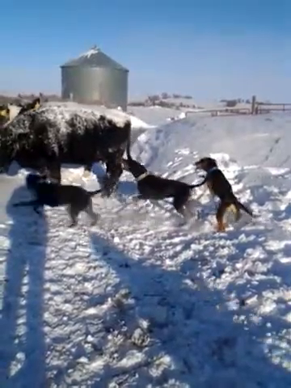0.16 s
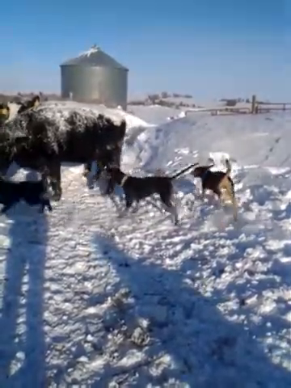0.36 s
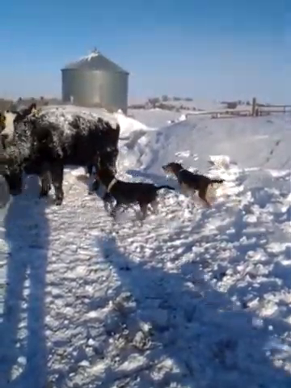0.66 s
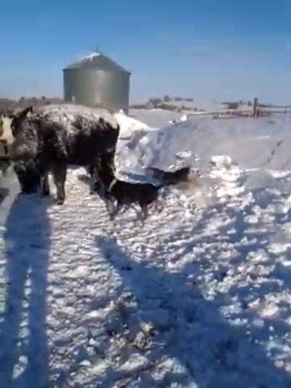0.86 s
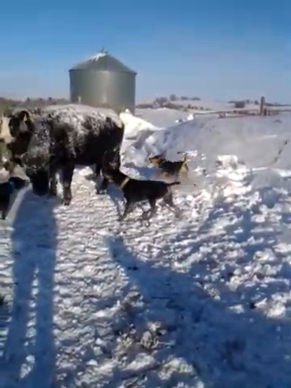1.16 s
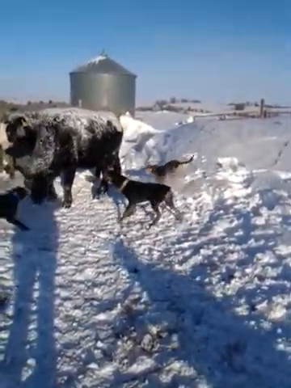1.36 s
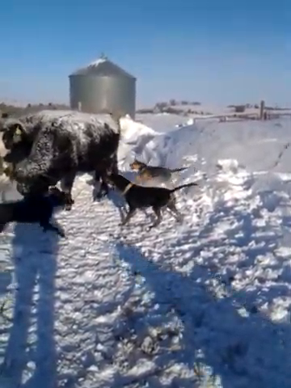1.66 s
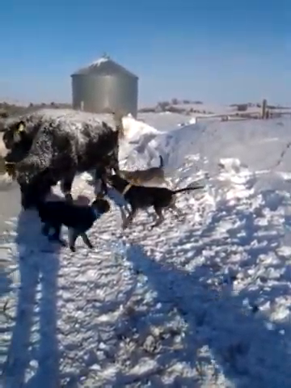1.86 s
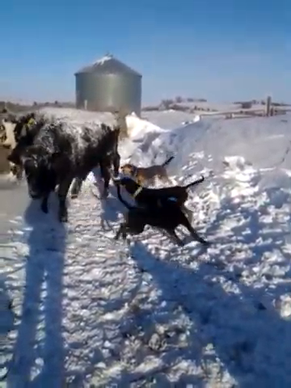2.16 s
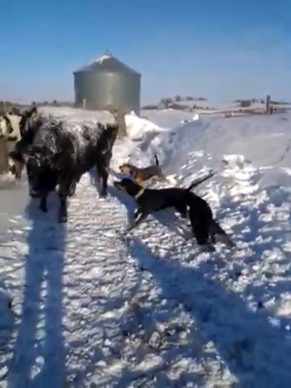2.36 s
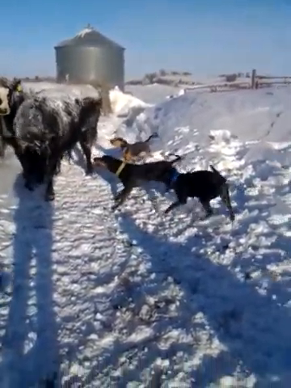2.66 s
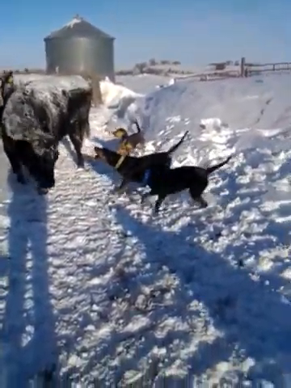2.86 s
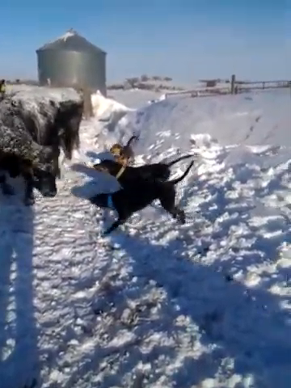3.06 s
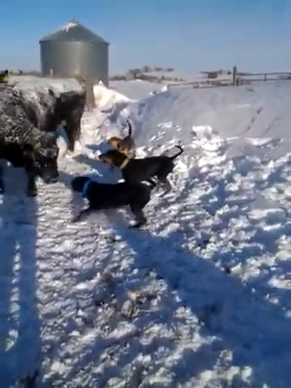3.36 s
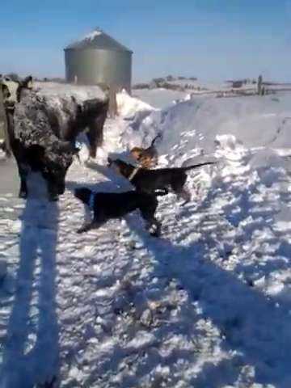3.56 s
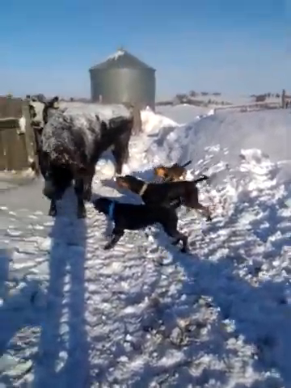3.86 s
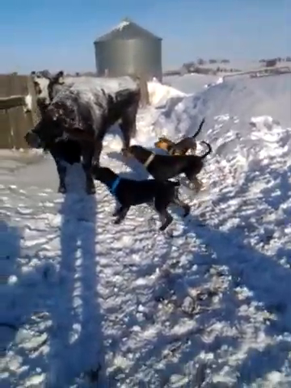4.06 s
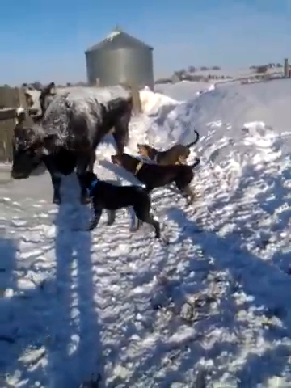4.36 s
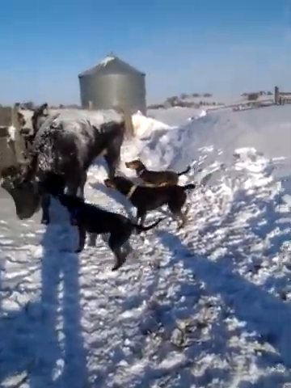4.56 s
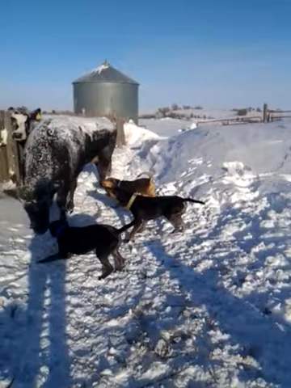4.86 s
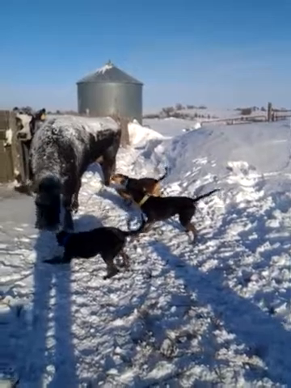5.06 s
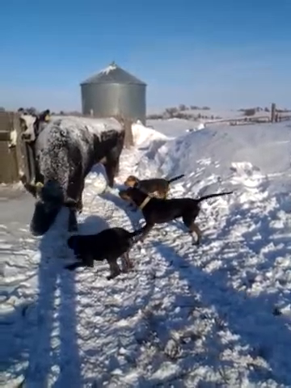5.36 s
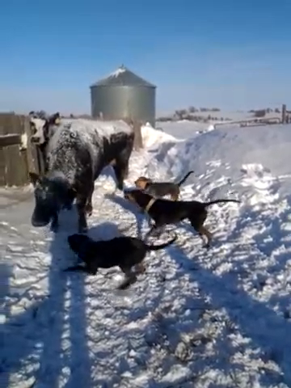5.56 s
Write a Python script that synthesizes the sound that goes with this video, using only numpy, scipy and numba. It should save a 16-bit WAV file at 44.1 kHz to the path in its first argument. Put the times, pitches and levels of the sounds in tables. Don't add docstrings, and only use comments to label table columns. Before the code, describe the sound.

Three or so dogs bay almost without pause at a cow on a snowy farm. Full barks open rough and lock onto a ringing note, others are hoarse or sinking, with whines, a yip and a squeal around the middle. Snow crunches quietly beneath, with a dull hoof shift. Loud peaks clip flat on the right; the left is muffled, quiet and slightly hissy.

```python
import sys
import numpy as np
from scipy import signal
from scipy.fft import rfft, irfft, next_fast_len
from scipy.io import wavfile
from scipy.ndimage import uniform_filter1d, map_coordinates
from numba import njit

SR = 44100
rng = np.random.default_rng(int(sys.argv[2]) if len(sys.argv) > 2 else 0)


def gain_from_db(level_db):
    decades = np.asarray(level_db, float) / 20
    return 10 ** decades


def output_pcm(signal):
    pcm = np.clip(np.atleast_2d(signal).T, -1, 1) * 32767
    wavfile.write(sys.argv[1], SR, np.round(pcm).astype(np.int16))


N = 252252


def unit(x):
    return x / np.sqrt(np.mean(x ** 2) + 1e-20)


def along(points, hz):
    f, v = np.transpose(points)
    return np.interp(np.log(hz + 1), np.log(f + 1), v)


def wobble(count, rate):
    knots = rng.standard_normal(int(count * rate / SR) + 4)
    return map_coordinates(knots, [np.arange(count) * rate / SR])


def coloured(x, points, lag=0):
    m = next_fast_len(N + 8192)
    hz = np.fft.rfftfreq(m, 1 / SR)
    response = gain_from_db(along(points, hz)) * np.exp(-2j * np.pi * hz * lag)
    return irfft(rfft(x, m) * response, m)[..., :N]


def swells(events):
    t = np.arange(N) / SR
    return sum(gain_from_db(db) * np.exp(-((t - s) / spread) ** 2) for s, spread, db in events)


@njit
def resonate(x, hz, width):
    y = np.zeros(len(x))
    r = np.exp(-np.pi * width)
    for i in range(2, len(x)):
        drive = (1 - r * r) / 2 * (x[i] - x[i - 2])
        y[i] = drive + 2 * r * np.cos(2 * np.pi * hz[i]) * y[i - 1] - r * r * y[i - 2]
    return y


def clear_note(pitch, note_db, rasp_db, mouth, turns, strain, width_hz, fall_db):
    count = len(pitch)
    order = np.arange(1, 9)[:, None]
    near = 1 / np.hypot(1, (order * pitch - mouth) / width_hz)
    weight = (near ** 2 + .02) * gain_from_db(fall_db * np.log2(order)) / (1 + (order / 5) ** 4)
    whistle = .03 * (pitch / 1290) ** 4 / (1 + ((order * pitch - 5200) / 450) ** 4)
    weight = weight + whistle / (1 + gain_from_db(2 * (rasp_db - note_db + 17)))
    weight = weight * gain_from_db(3.5 * np.array([wobble(count, 60) for _ in order]))
    note = np.sum(weight * np.sin(2 * np.pi * order * turns), 0)
    note = note / np.sqrt(np.sum(weight ** 2, 0) / 2)
    return note * gain_from_db(58 * strain * wobble(count, 85.4))


def rough_rasp(mouth, turns, throat):
    count = len(mouth)
    loose = turns / 2 + .15 * wobble(count, 220)
    slaps = np.gradient(np.floor(np.maximum.accumulate(loose))) * gain_from_db(2.28 * wobble(count, 302.6))
    air = rng.standard_normal(count) * (1 + 0.13 * np.cos(2 * np.pi * loose))
    source = unit(slaps) + .5 * unit(air)
    rasp = resonate(resonate(source, mouth / SR, 330 / SR), mouth / SR, 330 / SR)
    for hz, w, db in throat:
        at = np.full(count, hz / SR)
        rasp = rasp + gain_from_db(db) * resonate(resonate(source, at, w / SR), at, w / SR)
    return rasp, air


def bark(rows, width_hz, throat, jitter, fall_db, air_db):
    s, *cols = np.transpose(rows)
    t = np.arange(s[0], s[-1], 1 / SR)
    pitch, note_db, rasp_db, mouth = [np.interp(t, s, c) for c in cols]
    count = len(t)
    strain = jitter + .04 / (1 + gain_from_db(note_db - rasp_db) ** 2)
    turns = np.cumsum(pitch * (1 + strain * wobble(count, 160))) / SR
    note = clear_note(pitch, note_db, rasp_db, mouth, turns, strain, width_hz, fall_db)
    rasp, air = rough_rasp(mouth, turns, throat)
    gust_db = 2.5 * wobble(count, 26)
    edge = np.clip(np.minimum(t - s[0], s[-1] - t) / 0.006, 0, 1)
    rough = unit(rasp) + gain_from_db(air_db + gust_db) * unit(air)
    return edge * (gain_from_db(note_db) * note + gain_from_db(rasp_db) * rough)


# mouth width/Hz, throat resonances (f/Hz, width/Hz, level/dB), overtone fall/dB per octave,
# level/dB at the covered port
VOICE_BODIES = [
    (90, [(1026.5, 318, 0.5), (1694, 192, -3), (2497, 290, -13.5)], -3, -2.5),
    (190, [(1150, 310, -3.5), (1621, 157, -4.5), (2410, 220, -26)], 2.5, -5),
    (254, [(1052, 300, -10.5), (1473, 266, -5.5), (1940, 248, -7.5)], 3, -4),
    (340, [(1570, 430, -7), (2260, 420, -44)], -8, -6),
    (405, [(1300, 280, -4), (1885, 230, -6.5)], 3.5, -4),
]
VOICE_JITTER = [.005, .018, .03, .012, .014]
VOICE_AIR = [-20, -17, -17.5, -16.5, -14.5]


def dog(calls, voice):
    width_hz, throat, fall_db, _ = VOICE_BODIES[voice]
    out = np.zeros(N + SR)
    for gesture, barks in calls:
        phase, bend, note_db, rasp_db, mouth = np.transpose(gesture)
        for start, rise, fall, db, hz in barks:
            s = start + rise + phase * np.where(phase < 0, rise, fall)
            rows = np.transpose([s, bend * hz, note_db + db, rasp_db + db, mouth * hz])
            call = bark(rows, width_hz, throat, VOICE_JITTER[voice], fall_db, VOICE_AIR[voice])
            out[round(s[0] * SR):][:len(call)] += call
    return out[:N]


# phase, pitch/ratio, clear note level/dB, rasp level/dB, mouth/ratio
LOCK_ON_GESTURE = [(-1, .56, -50.5, -38.5, 0.62), (-.68, .7, -21, -10, .7), (-.45, .89, -6.5, -3.5, 0.953),
                   (-.2, .95, -15, -0.5, 1.354), (0, 1.0, -6.5, -2, 1.05), (0.17, 1.0, 0.2, -9, 0.9),
                   (0.539, 1.0, -9, -14.5, 0.99), (.8, 0.94, -19.5, -14.5, 1.04),
                   (1, 1.5, -23, -36.5, 1.24)]
PUFF_GESTURE = [(-1, .95, -60, -27, 1.22), (0, 1.0, -33, -0.1, 0.93), (0.83, 0.99, -60, -21.5, 0.92)]
# t/s, rise/s, fall/s, level/dB, f/Hz. The big dog's full barks:
BIG_BARKS = [
    (.83, .092, 0.12, 1.5, 574),
    (1.555, 0.062, 0.13, -0.5, 575),
    (2.286, .096, 0.13, 2, 576.8),
    (3.272, 0.097, 0.11, -3, 581),
    (3.905, .105, 0.096, 0.5, 584),
    (4.534, .098, 0.12, -0.8, 582.3),
    (5.279, .114, 0.09, 0.8, 581.4),
]
BIG_CRACKS = [
    (.77, 0.048, 0.063, -26, 318.4),
    (.95, 0.013, 0.02, 0.1, 574.5),
    (1.675, 0.016, .02, -6.5, 571),
    (2.26, 0.025, 0.016, -42, 310),
    (2.42, 0.013, 0.023, -2, 559.5),
    (3.41, 0.016, 0.026, -11, 619.6),
    (5.25, 0.024, 0.016, -35, 313),
]


def big_dog():
    return dog([(LOCK_ON_GESTURE, BIG_BARKS), (PUFF_GESTURE, BIG_CRACKS)], 0)


SINGING_GESTURE = [(-1, 1.0, -31.5, -31.5, 1.13), (-0.52, .94, -18.5, -11.5, 1.64), (0, 1.0, -3.5, -6, 2),
                   (.3, 1.01, -2.5, -9, 1.92), (.5, 1.03, -13, -11.5, 2.02), (.56, 1.15, -12.5, -17.5, 1.2),
                   (0.793, 1.2, -18, -20, 1.3), (0.907, 1.01, -27, -20, 1.5)]
# t/s, rise/s, fall/s, level/dB, f/Hz
SINGER_BARKS = [
    (1.335, 0.041, .14, -2.5, 373.8),
    (1.835, 0.048, 0.088, -2, 387.6),
    (2.893, 0.046, 0.12, -2, 379.8),
    (4.29, 0.075, .08, -2.5, 383.6),
    (4.851, .059, .105, -1.2, 381.7),
    (5.53, 0.06, 0.094, -1, 384.1),
]


def singing_dog():
    return dog([(SINGING_GESTURE, SINGER_BARKS)], 1)


FALLING_GESTURE = [(-1, 1.0, -30, -38, 1.09), (-0.632, 1.05, -10.5, -10, 1.17), (0, .93, -9.5, -5.5, 1.287),
                   (.2, .86, -10, -9, 0.95), (.4, .73, -15, -24, 0.98), (.55, .69, -15, -39.5, 1.28),
                   (.72, .66, -28.5, -28, 0.53), (0.91, .56, -53, -29, 0.56)]
BLURT_GESTURE = [(-1, 1.02, -39, -41.5, 1.26), (-0.582, 1.1, -9.5, -9.5, 1.304), (0, .95, -14, -7, 1.556),
                 (.3, 1.0, -11.5, -14.5, 1.184), (.55, 0.9, -23.5, -14.5, 1.08),
                 (.72, 0.61, -26.5, -23, 1.22), (1, 1.6, -56, -37, 0.67)]
# t/s, rise/s, fall/s, level/dB, f/Hz
HOARSE_FALLS = [
    (.268, 0.045, .085, -3, 599.3),
    (2.485, 0.054, 0.14, -4, 615.5),
    (3.58, .05, .14, 1.2, 604),
]
HOARSE_BLURTS = [
    (.431, .045, 0.13, 0, 540),
    (3.057, .045, .115, -0.4, 545),
    (1.822, .03, 0.071, -1.5, 650),
    (3.203, 0.0262, .05, -6, 470),
    (4.105, .06, 0.12, -0.7, 570),
]


def hoarse_dog():
    return dog([(FALLING_GESTURE, HOARSE_FALLS), (BLURT_GESTURE, HOARSE_BLURTS)], 2)


ARCH_GESTURE = [(-1, .9, -25.5, -23.5, 1.59), (-.65, .94, -12.5, -15, 1.85), (-.3, 1.03, -13, -14, 1.6),
                (0, 1.08, -9, -12.5, 1.87), (.25, 1.02, -15.5, -11.5, 1.83), (0.435, 1.3, -23, -23.5, 1.17),
                (.68, 1.04, -20.5, -28.5, 1.09), (1, 0.63, -65.5, -32, 0.8)]
# t/s, rise/s, fall/s, level/dB, f/Hz
LOW_BARKS = [
    (1.012, 0.096, .135, -0.2, 434.4),
    (2.57, 0.043, 0.078, -3.5, 419.4),
    (3.255, 0.047, 0.047, -0.5, 406),
    (4.43, .06, 0.086, -4.5, 389),
    (5.0, 0.068, .135, -0.5, 428.7),
    (5.64, .05, 0.11, -1.5, 427),
]


def low_hoarse_voice():
    return dog([(ARCH_GESTURE, LOW_BARKS)], 4)


CRY_GESTURE = [(-1, .84, -38, -32.5, 0.72), (-0.644, 0.79, -11.5, -23.5, 0.85), (-.3, .9, -16, -18, 0.98),
               (0, 0.98, -22.5, -15, 0.91), (0.42, 1.0, -14.5, -13, 0.78), (1, 0.71, -35, -16.5, 0.71)]
DROP_GESTURE = [(-1, 1, -38.5, -35.5, .97), (-0.47, 1.0, -15, -31, 0.64), (-0.0084, 1.0, -13.5, -20, 1.0),
                (.4, 0.97, -19, -16, .88), (0.94, 0.642, -22, -18, 0.32)]
YIP_GESTURE = [(-1, .95, -27, -50, 1.05), (0.05, 1.0, -5, -28, 1.9), (.6, 1.05, -9, -19, 2.3),
               (1, 1.08, -24, -26, 1.8)]
BREAK_GESTURE = [(-1, .68, -25, -32, .9), (-.6, .78, -7, -23, 1.28), (0, .98, -9, -32, 0.83),
                 (.5, 1.01, -8.5, -42, 0.9), (.85, 1.0, -12, -34, 0.55), (1, .99, -22, -33, .985)]
# t/s, rise/s, fall/s, level/dB, f/Hz; the next three tables have the same columns
YELP_CRIES = [
    (1.445, .055, 0.082, -1.5, 1231),
    (3.203, 0.05, 0.038, 0.1, 1190),
    (4.984, 0.05, 0.041, 0.1, 1176),
    (5.65, .045, 0.017, -5, 1198),
]
WHINE_CRIES = [
    (1.901, 0.048, 0.045, -1, 1255),
    (1.935, .07, .04, -8, 637),
    (2.60, .03, .045, -9, 1300),
    (3.845, 0.047, 0.042, -16.5, 559),
    (4.395, .05, .015, -1.5, 1200),
    (1.435, 0.037, 0.024, -1.5, 851),
    (4.325, 0.049, 0.013, -6.5, 1150),
    (5.03, .06, 0.039, -7, 1287),
]
YIP_CRIES = [
    (3.823, 0.015, 0.026, 0.091, 759),
]
SQUEAL_CRIES = [
    (3.846, .029, 0.0764, 0.1, 1278),
]


def yelps():
    return dog([(CRY_GESTURE, YELP_CRIES), (DROP_GESTURE, WHINE_CRIES),
                (YIP_GESTURE, YIP_CRIES), (BREAK_GESTURE, SQUEAL_CRIES)], 3)


# f/Hz, t60/s
YARD_DECAY = [(200, 0.16), (600, 0.35), (2000, 0.22), (8000, 0.5)]


def yard(x):
    hz, t, z = signal.stft(rng.standard_normal((2, SR // 2)), SR, nperseg=256)
    decay = gain_from_db(-60 * t / along(YARD_DECAY, hz)[:, None])
    tail = signal.istft(z * decay, SR, nperseg=256)[1]
    delayed = np.pad(x, (700, 0))[None]
    return signal.fftconvolve(delayed, tail / np.linalg.norm(tail[0]), axes=1)[:, :N]


# t/s, crunch level/dB
SNOW_LEVEL = [
    (.3, -29),
    (.75, -32),
    (2.1, -32),
    (2.169, -41),
    (2.24, -35),
    (3.75, -35),
    (4.4, -34.5),
    (5.251, -40),
]
# f/Hz, level/dB per Hz
SNOW_COLOUR = [(60, -4.5), (300, 3.5), (1000, -0.5), (3000, -7), (5000, -11.5), (6800, -1.5), (8600, -11.5),
               (14000, -16.5)]


def snow():
    s, db = np.transpose(SNOW_LEVEL)
    grit = rng.standard_normal(N) * gain_from_db(0.29 * wobble(N, 21) + 1.2 * wobble(N, 200))
    return gain_from_db(np.interp(np.arange(N) / SR, s, db)) * unit(coloured(grit, SNOW_COLOUR))


# t/s, spread/s, level/dB
COW_TREADS = [
    (2.76, 0.1, -36.5),
    (5.22, 0.046, -46),
]


def cow():
    thud = coloured(rng.standard_normal(N), [(60, -5), (200, -4), (1000, -53)])
    return swells(COW_TREADS) * unit(thud)


# t/s, spread/s, level/dB
GLOVE_RUBS = [
    (3.89, 0.065, -40),
    (4.3, 0.039, -35),
]
# f/Hz, level/dB per Hz
GLOVE_HISS = [(40, -8), (130, 0), (350, -10), (600, -18), (1700, -25), (6700, -30), (14400, -25)]


def glove():
    level = gain_from_db(-51.0 + 1.1 * wobble(N, 3.87)) + swells(GLOVE_RUBS)
    return level * unit(coloured(rng.standard_normal(N), GLOVE_HISS))


# f/Hz, level/dB
OPEN_COLOUR = [(60, 7.5), (250, 4), (500, 5.5), (2400, -0.5), (5200, 5.5), (6800, 11), (8500, -1.5),
               (14000, -17.5)]


def open_port(pack, echo):
    return gain_from_db(2) * coloured(pack + gain_from_db(-14.5) * echo, OPEN_COLOUR) + snow() + cow()


# f/Hz, level/dB
GLOVE_COLOUR = [(100, -10.5), (600, -11.5), (1100, -18), (1800, -21.5), (2500, -26.5), (3500, -52)]


def covered_port(dogs, echo):
    muffled = sum(gain_from_db(body[3]) * x for x, body in zip(dogs, VOICE_BODIES))
    return coloured(muffled + gain_from_db(-14.5) * echo, GLOVE_COLOUR, lag=.00008) + glove()


def scene():
    dogs = [big_dog(), singing_dog(), hoarse_dog(), yelps(), low_hoarse_voice()]
    pack = sum(dogs)
    echo = yard(pack)
    return np.array([covered_port(dogs, echo[0]), open_port(pack, echo[1])])


def thinned(x, mask_db, rise_db, loudness, top_hz=14500):
    hz, _, z = signal.stft(x, SR, nperseg=2048)
    power = np.abs(z) ** 2
    band = np.arange(len(hz)) // 12
    luck = gain_from_db(6 * rng.standard_normal((band[-1] + 1, z.shape[1])))[band]
    limit = luck * gain_from_db(2 * (mask_db + rise_db * hz[:, None] / 10000)) * np.sum(power, 0) ** loudness
    keep = (uniform_filter1d(power, size=3, axis=0) > limit) | (hz[:, None] < 1600)
    grain = rng.standard_normal(z.shape) + 1j * rng.standard_normal(z.shape)
    z = z + gain_from_db(-19) * np.sqrt(np.abs(uniform_filter1d(power, size=16, axis=0))) * grain
    return signal.istft(z * keep * (hz[:, None] < top_hz), SR, nperseg=2048)[1][:N]


def low_pass(x):
    return signal.sosfilt(signal.butter(12, 20000, fs=SR, output="sos"), x)


def record(dry):
    flat = dry / (1 + np.abs(dry / .975) ** 10) ** (1 / 10)
    left = thinned(flat[0], mask_db=-81, rise_db=3, loudness=.45)
    right = thinned(flat[1], mask_db=-87, rise_db=21.5, loudness=0.26)
    started = np.arange(N) > .303 * SR
    return low_pass(np.clip([left, right], -1, 1) * started)


dry = scene()
out = record(dry)
output_pcm(out)
```